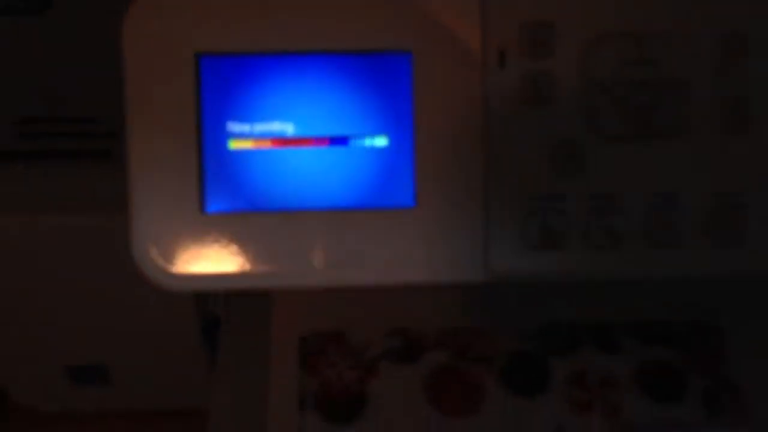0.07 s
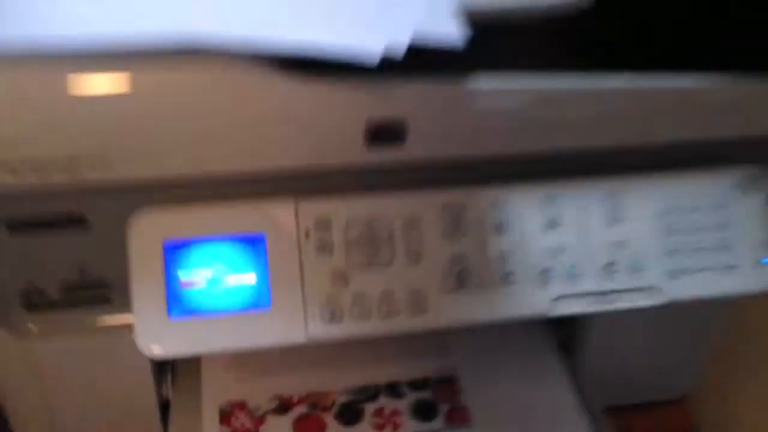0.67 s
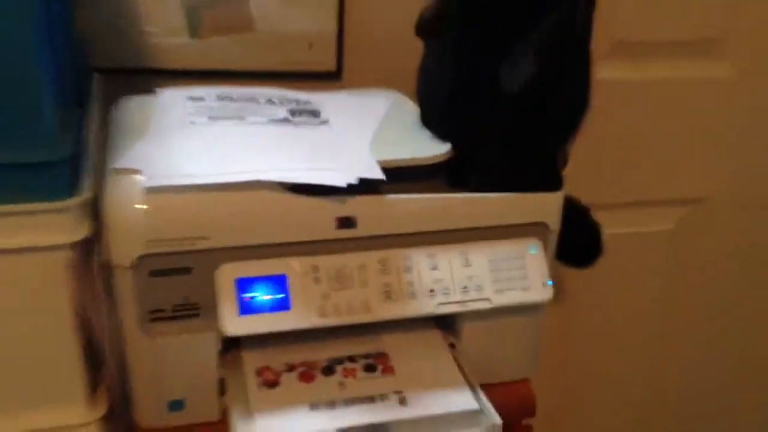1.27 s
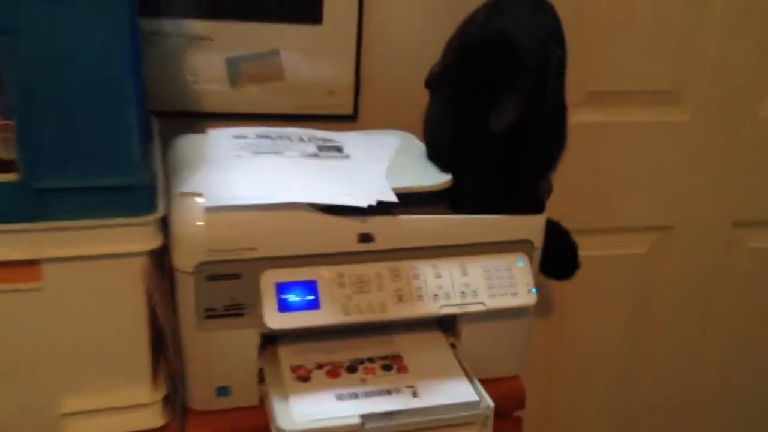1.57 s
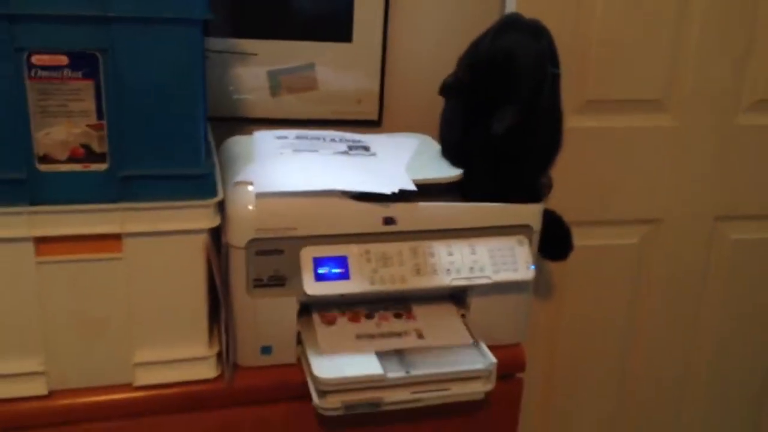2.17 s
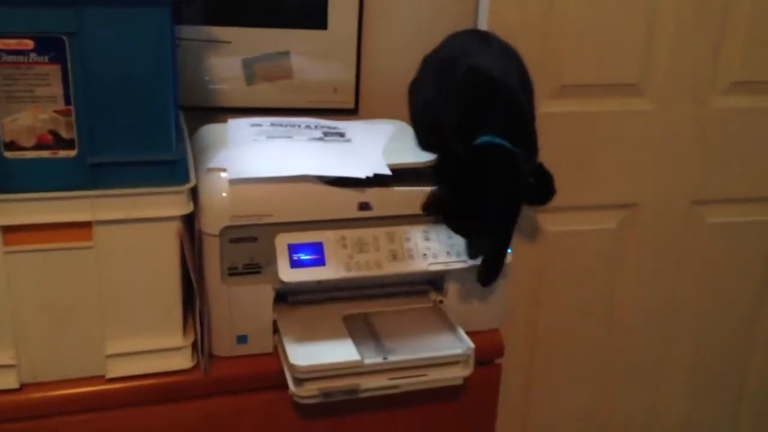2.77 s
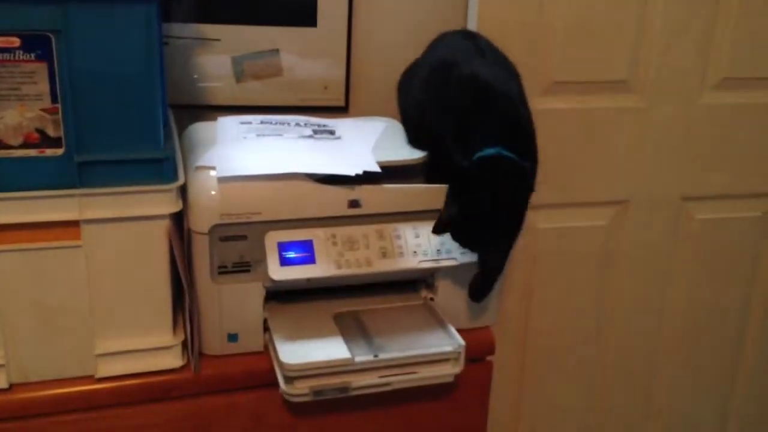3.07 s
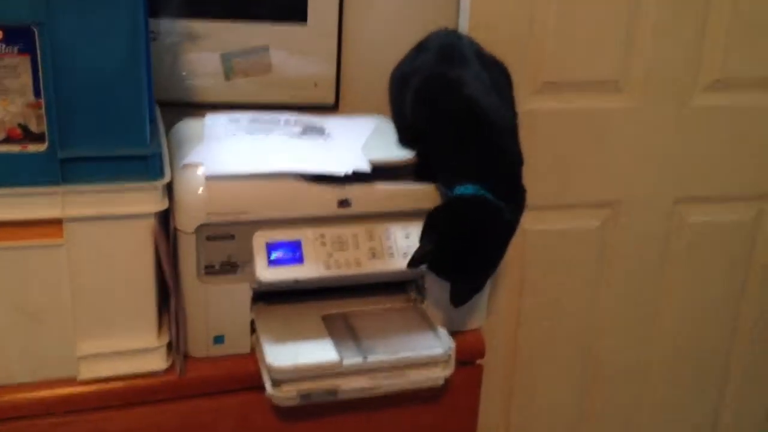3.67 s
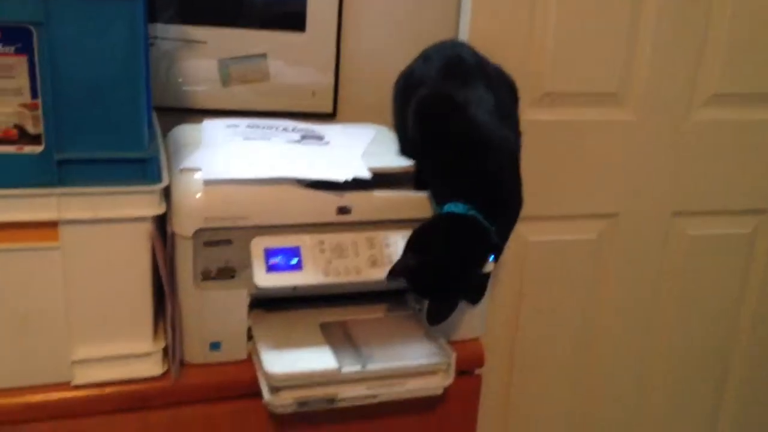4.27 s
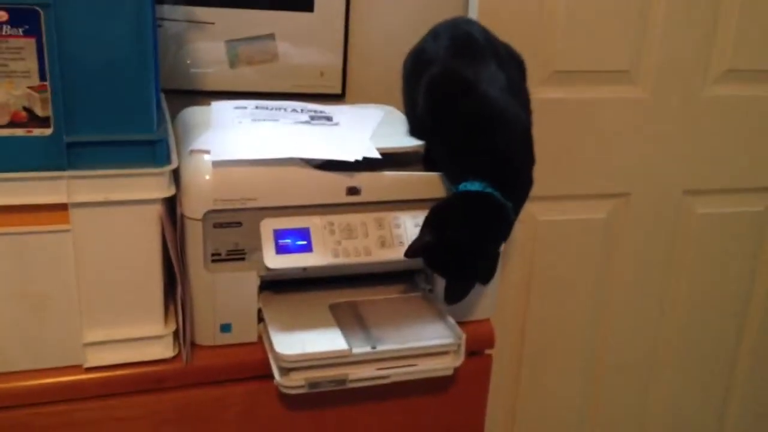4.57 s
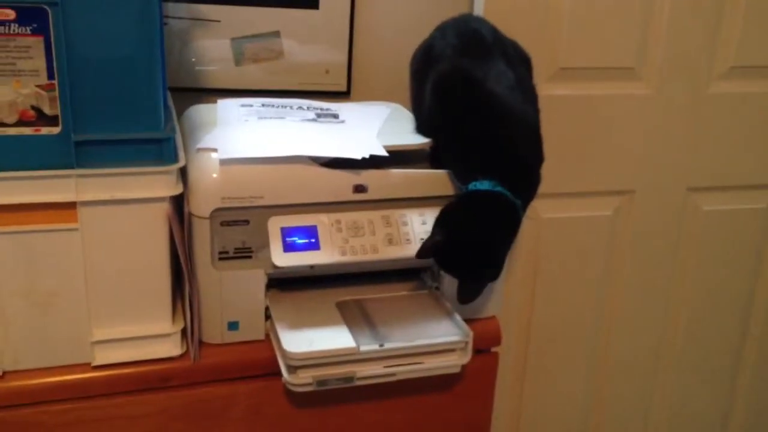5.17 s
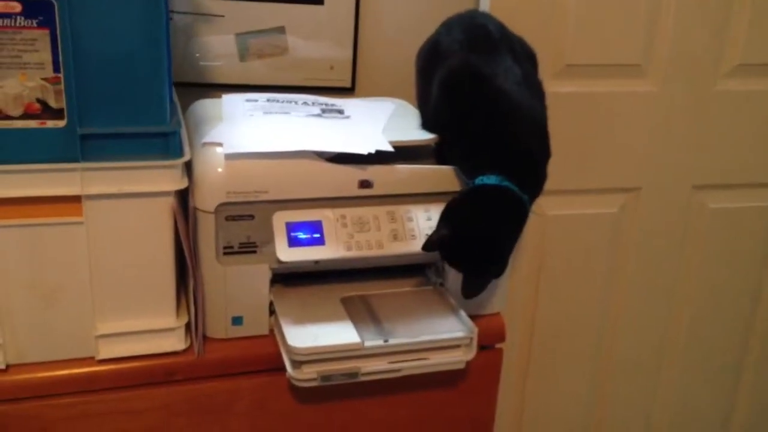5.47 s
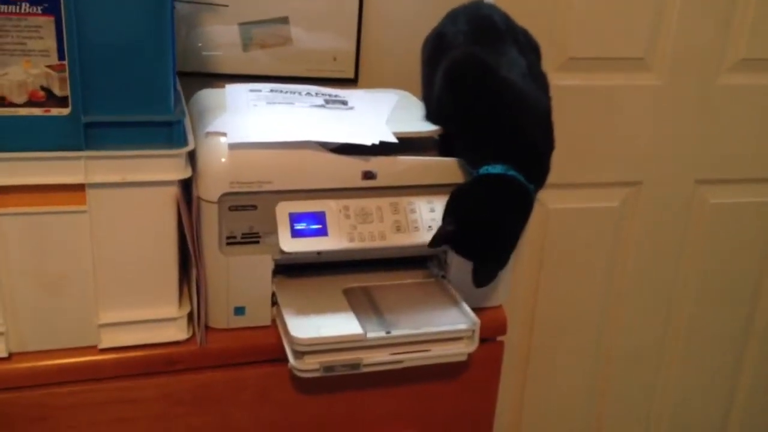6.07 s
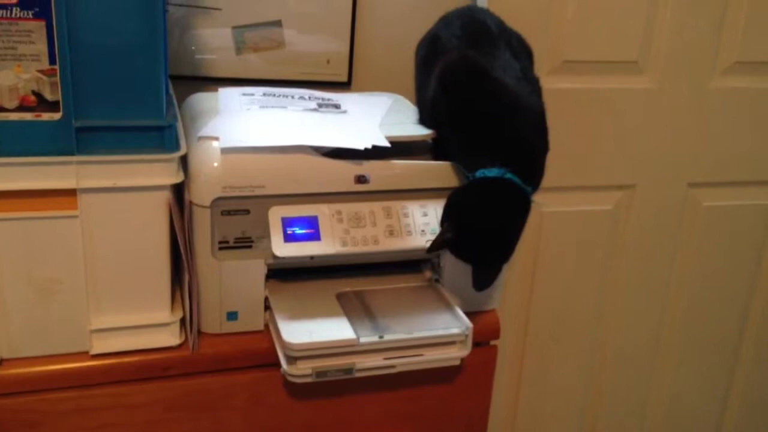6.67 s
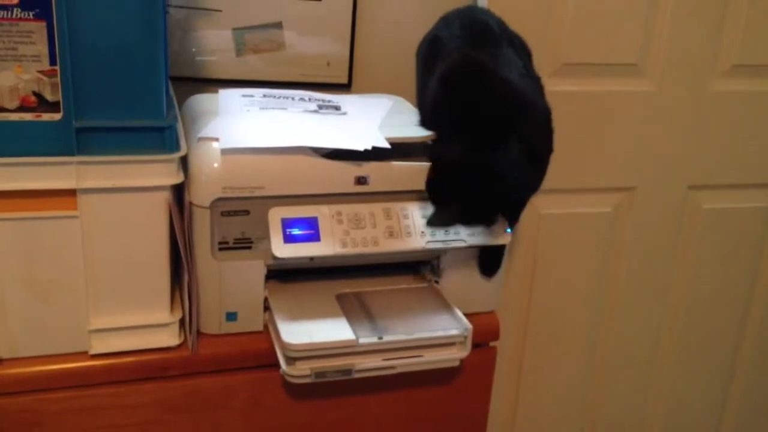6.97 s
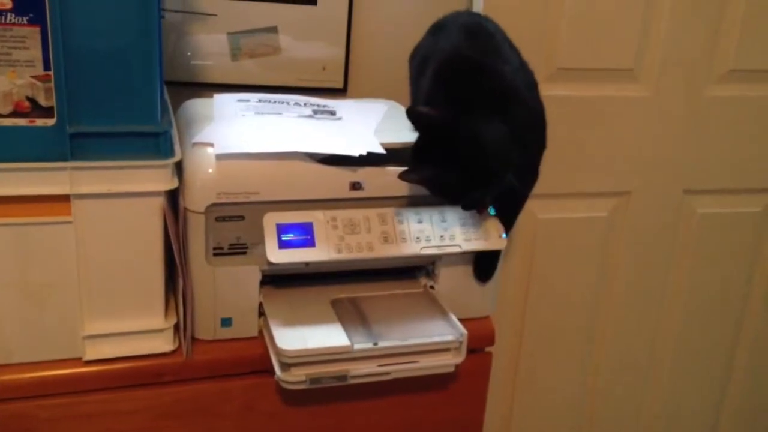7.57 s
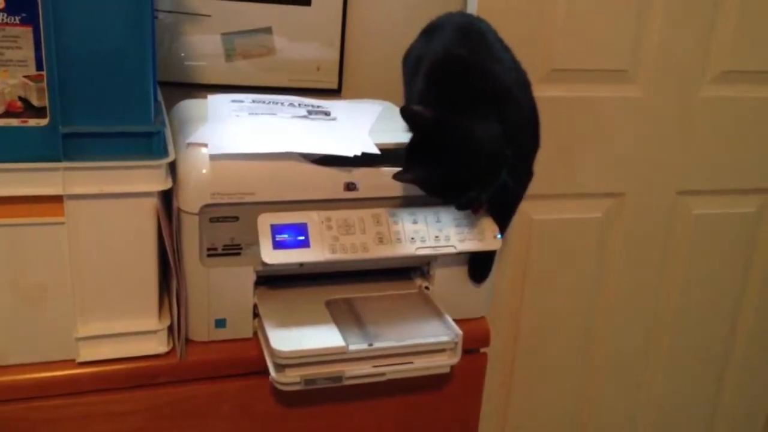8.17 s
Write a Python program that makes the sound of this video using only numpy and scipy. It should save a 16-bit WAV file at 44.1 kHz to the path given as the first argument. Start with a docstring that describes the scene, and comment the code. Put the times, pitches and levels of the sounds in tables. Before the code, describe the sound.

An inkjet printer runs close by in a small room, over a soft hush and faint low rustle. At about 0.4 seconds a loud plastic clack and squeak set off the carriage, which rubs along its rail with more clicks, short squeaks and dull knocks until a sharp snap at 2 seconds. The rollers then push out a sheet with a soft gear rattle and paper rasp, with a brief rubbery groan at 2.5 seconds. From 3.7 seconds the gears rattle louder in spurts. A heavy clunk, the loudest moment, lands at 4.6 seconds, followed by small squeaks and a sharp clack at 5.1. From about 5.4 seconds faint print passes of motor whine and sizzling hiss alternate with short paper steps. There is a knock at 6.2 seconds, then light thumps and tiny groans around 8 seconds as printing continues to the end.

```python
"""Plastic clacks and squeaks over a soft hush: an inkjet printer's carriage shuffles in a small room.
Latches snap and rebound, sliding parts stick and slip, and heavy blows ring the case. Gears rattle and
paper rasps as the rollers push one sheet out and clunk in the next; dragging rubber groans briefly.
Then short paper steps alternate with print passes of motor whine, belt hiss and nozzle sizzle."""
import sys
import numpy as np
from scipy import signal
from scipy.fft import rfft, irfft
from scipy.io import wavfile
from scipy.ndimage import uniform_filter1d

SR = 44100
rng = np.random.default_rng(int(sys.argv[2]) if len(sys.argv) > 2 else 0)


def inscribe(sig):
    """Save sig as 16-bit PCM at rate SR to the path in sys.argv[1].

    A 1-D sig is mono; a 2-D sig holds one channel per row.
    Samples are clipped to [-1, 1] before scaling.
    """
    pcm = np.round(np.clip(np.atleast_2d(sig).T, -1, 1) * 32767)
    wavfile.write(sys.argv[1], SR, pcm.astype(np.int16))


N = 371322
TIME = np.arange(N) / SR

# Sliding parts that stick, slip and hit their stop. Each row: peak time in seconds, level in dB,
# pitch in Hz, level of the guide's ring in dB, level of the knock in dB, rattle t60 in seconds.
SLIPS = [(0.449, -18, 3260, -26, -38, .035), (0.547, -35, 2420, -35.5, -40.5, .07),
         (0.703, -35, 3410, -47, -50, 0.045), (.711, -32, 2220, -28, -38, 0.025),
         (.845, -38.5, 2500, -35.5, -46, 0.075), (1.345, -47, 2790, -54.5, -56, 0.074),
         (1.402, -47, 4030, -46.5, -58.5, 0.27), (1.507, -34, 2600, -35, -58, 0.27),
         (1.636, -35, 2190, -38, -44, 0.13), (1.677, -37.5, 2500, -54, -50.5, 0.14),
         (1.756, -39, 2780, -45, -52, 0.1), (1.881, -32.5, 2540, -44, -51.5, 0.3),
         (1.928, -35, 1940, -35.5, -45, 0.26), (2.529, -48, 3390, -58, -50.5, 0.078),
         (2.728, -50, 2080, -66, -55, .04), (4.711, -38.5, 2300, -55, -47, .06),
         (4.847, -39.5, 2400, -64, -51, 0.095), (4.913, -48, 2300, -67, -43.5, 0.15)]
# Turns of the feed rollers: they eject a sheet, run free, pick up a new one, bring it under the head
# and step it on. Each row: start and end in seconds, gear level in dB, paper level in dB.
ROLLER_TURNS = [(1.86, 2.178, -53.5, -50), (2.163, 3.719, -53.5, -51), (3.676, 3.838, -42.5, -57),
                (3.801, 4.087, -45.5, -58), (4.265, 4.527, -41.5, -55), (4.509, 4.739, -39.5, -49),
                (4.796, 5.114, -58.5, -72), (5.842, 5.935, -42.5, -53), (6.147, 6.268, -44.5, -52),
                (6.225, 6.456, -49.5, -52), (6.885, 7.029, -53.5, -52), (7.483, 7.62, -51, -50),
                (8.038, 8.181, -52, -51)]


def gain_of(db):
    """Decibels to amplitude."""
    return 10 ** (np.asarray(db) / 20)


def unit_rms(x):
    """Scales a signal to rms 1."""
    return x / np.sqrt(np.mean(x ** 2) + 1e-20)


def curve_at(points, hz):
    """Reads a curve of (Hz, value) points on a log-frequency axis."""
    f, value = np.transpose(points)
    return np.interp(np.log(hz + 1), np.log(f + 1), value)


def add(mix, s, sound):
    """Mixes a sound in at s seconds."""
    part = mix[max(round(s * SR), 0):][:len(sound)]
    part += sound[:len(part)]


def colour(x, db_at, size=4096):
    """Minimum-phase EQ of unit energy, shaped by the function db_at(Hz)."""
    log_gain = np.log(gain_of(db_at(abs(np.fft.fftfreq(size, 1 / SR)))) + 1e-6)
    taps = np.fft.ifft(np.exp(np.conj(signal.hilbert(log_gain)))).real[:size // 2]
    return signal.fftconvolve(x, taps / np.linalg.norm(taps))[:len(x)]


def wander(rate_hz):
    """Smooth random modulation of rms 1, no faster than the rate."""
    slow = np.fft.rfftfreq(N, 1 / SR) < rate_hz
    return unit_rms(irfft(rfft(rng.standard_normal(N)) * slow, N))


def patchy_noise(spectrum, patchy_db):
    """Coloured noise whose level flickers, like a grip that comes and goes."""
    noise = rng.standard_normal(N) * gain_of(patchy_db * wander(150))
    return unit_rms(colour(noise, lambda f: curve_at(spectrum, f)))


def ramps(start, end, rise, fall):
    """Envelope within 0 to 1: it ramps up, holds if there is time and ramps down."""
    return np.clip(np.minimum((TIME - start) / rise, (end - TIME) / fall), 0, 1)


def move(start, end, db, rise, fall, ease_db_per_s=0):
    """Gain over one move: ramped at both ends, and able to ease off on the way."""
    elapsed = np.clip(TIME - start, 0, end - start)
    return ramps(start, end, rise, fall) * gain_of(db + ease_db_per_s * elapsed)


def background(fade_s=0.057, rest_db=-70):
    """A steady hush, with a soft low rustle close by that swells now and then."""
    # Spells of rustle. Each row: start and end in seconds, level in dB.
    spells = [(-.06, 0.083, -52.5), (.3, 0.73, -64.5), (1.436, 4.1, -66.5), (7.893, 8.44, -62.5)]
    # Tone of the rustle. Each row: frequency in Hz, level in dB.
    rustle_spectrum = [(40, -27), (90, -13), (160, 2.5), (270, -2.5), (600, -11), (1500, -15), (4000, -22),
                       (15000, -46.5)]
    # Tone of the hush. Each row: frequency in Hz, level in dB.
    hush_spectrum = [(25, -23.5), (70, -26.5), (110, -10.5), (170, -5), (300, -6.5), (520, -14.5),
                     (850, -12), (1300, -27), (2100, -11), (2700, -11.5), (4000, -8.5), (7000, -11.5),
                     (15400, -14.5)]
    stir = gain_of(2.2 * wander(12))
    swells = sum(move(start, end, db, fade_s, fade_s) for start, end, db in spells)
    rustle = np.hypot(gain_of(rest_db), swells) * stir * patchy_noise(rustle_spectrum, patchy_db=1.5)
    return gain_of(-67) * patchy_noise(hush_spectrum, patchy_db=-0.5) + rustle


def snap(mix, s, db, t60, tilt, bass_db, part_hz, scrape_db=-19, scrape_s=0.0066, bass_hz=800):
    """Mixes in one plastic hit: a brief scrape, then a dying chatter of contacts that rings the part."""
    # Tone of struck plastic. Each row: frequency in Hz, level in dB.
    plastic_spectrum = [(60, -43.5), (150, -9), (300, -8), (550, -1.5), (1000, -2), (1500, -1), (2500, 1.5),
                        (4000, -1.5), (6000, -5), (9000, -10.5), (13000, -18), (16000, -19.5)]
    t = np.arange(-SR // 50, SR // 4) / SR
    chatter = gain_of(2 * unit_rms(uniform_filter1d(rng.standard_normal(len(t)), size=40)))
    scrape = gain_of(scrape_db) * np.exp(-abs(t) / scrape_s)
    envelope = np.where(t < 0, scrape, gain_of(-60 * abs(t) / t60))
    force = rng.standard_normal(len(t)) * chatter * envelope
    force *= np.linalg.norm(envelope) / np.linalg.norm(force)

    def body_db(f):
        slope = tilt * np.log2(np.hypot(f, bass_hz) / 2500)
        shelf = bass_db / (1 + (f / bass_hz) ** 2)  # the case takes up the low push
        resonance = 6 / (1 + ((f / part_hz - 1) / 0.1) ** 2)  # the part's own damped ring
        return curve_at(plastic_spectrum, f) + slope + shelf + resonance

    add(mix, s + t[0], gain_of(db + 4) * colour(force, body_db))


def clacks():
    """Every latch snaps and rebounds once; every squeaking part knocks dully against its stop."""
    # Plastic parts snapping together. Each row: time in seconds, level in dB, rattle t60 in seconds,
    # treble tilt in dB per octave, bass shelf in dB, resonance of the part in Hz.
    latches = [(0.239, -44.5, 0.031, -.5, 13, 3900), (.288, -50, 0.018, 0.5, 14, 3250),
               (.447, -20.5, .018, 4.5, 9, 3200), (.607, -42.5, .035, 0, 17, 3220),
               (0.7104, -28.5, .02, -3, -2.5, 2120), (0.875, -52, 0.042, -2.5, -12, 2600),
               (1.633, -39, 0.056, 0, 9, 2200), (1.754, -37, 0.029, -2.5, -19, 2700),
               (1.810, -39, 0.043, -23, -41, 1920), (1.9966, -25, 0.08, 0.55, -2, 1440),
               (2.526, -45, 0.054, -4, 5, 3400), (3.019, -43.5, 0.045, -5.5, -25, 1460),
               (3.505, -48, 0.068, -6.5, -13, 4000), (4.415, -35.5, 0.085, 1, 9, 6140),
               (4.627, -36, 0.08, -3, 18, 2200), (4.638, -34, 0.098, -4.5, -25, 5340),
               (4.692, -38.5, .06, -5.5, -17, 3100), (5.0842, -25, .08, 0, 6.5, 4000),
               (6.1999, -37.5, 0.05, -7, -16, 3000), (6.255, -44.5, .09, -6, -16, 2400)]
    out = np.zeros(N)
    for s, db, t60, tilt, bass_db, part_hz in latches:
        snap(out, s, db, t60, tilt, bass_db, part_hz)
        # The rebound is softer, looser and duller.
        snap(out, s + 0.33 * t60, db - 11.5, t60 * 2.42, tilt - 1.5, bass_db, part_hz)
    for s, _, hz, _, knock_db, t60 in SLIPS:  # the knock lands just before the squeak peaks
        snap(out, s - 0.002, knock_db, t60, tilt=-9, bass_db=-13.5, part_hz=hz)
    return out


def carriage():
    """The carriage rubs along its rail, pulling hardest as it sets off."""
    # Runs along the rail. Each row: start and end in seconds, level in dB.
    runs = [(0.408, 0.457, -66), (0.553, 0.635, -42), (0.852, 1.086, -53), (1.51, 1.637, -48),
            (1.61, 1.832, -57), (4.849, 5.103, -58), (8.18, 8.265, -59.5)]
    # Tone of the rubbed rail. Each row: frequency in Hz, level in dB.
    rail_spectrum = [(59, -54), (100, -21), (152, -17.5), (192, -1.5), (262, -8), (570, 1.5), (674, -9.5),
                     (1070, -8.5), (1190, -13.5), (2520, -1.5), (3050, -0.5), (4350, -3), (4940, -6.5),
                     (6220, -7.5), (15000, -25.5)]
    rub = sum(move(start, end, db, rise=0.018, fall=0.056, ease_db_per_s=-24) for start, end, db in runs)
    return rub * patchy_noise(rail_spectrum, patchy_db=3.5)


def squeaks(guide_hz=3140, swell_s=0.0023, release_s=0.0038, rough_rad=0.45, grit_db=-9.5):
    """A slip builds up over a few uneven cycles, rings the guide beside it and is damped at once."""
    out, t = np.zeros(N), np.arange(-SR // 100, SR // 25) / SR
    envelope = np.exp(-np.where(t < 0, (t / swell_s) ** 2, t / release_s))
    for s, db, hz, ring_db, _, _ in SLIPS:
        grit = unit_rms(colour(rng.standard_normal(len(t)), lambda f: -16 * abs(np.log2((f + 100) / hz))))
        add(out, s + t[0], gain_of(db + grit_db) * envelope * grit)
        for tone_hz, tone_db in (hz, db), (guide_hz, ring_db):
            jitter = rough_rad * unit_rms(uniform_filter1d(rng.standard_normal(len(t)), size=60))
            tone = np.sin(2 * np.pi * tone_hz * t + jitter)
            add(out, s + t[0], gain_of(tone_db + 2.5) * envelope * tone)
    return out


def thumps(falloff_db_per_octave=7):
    """Heavy blows ring the low modes of the case, favouring those near the pitch each blow drives."""
    # Blows to the case. Each row: start in seconds, level in dB, frequency driven most in Hz,
    # attack in seconds.
    blows = [(.453, -40, 220, 0.0044), (0.609, -45, 228, 0.008), (1.639, -37, 200, 0.006),
             (1.81, -33.5, 235, 0.0042), (4.567, -32, 240, 0.0047), (4.626, -23.5, 210, 0.0016),
             (4.632, -20, 600, 0.0015), (4.679, -34, 210, .0045), (5.086, -40, 403, 0.0023),
             (6.195, -41, 190, 0.0051), (7.555, -48.5, 200, 0.006), (8.051, -40.5, 220, 0.0032),
             (8.193, -54, 220, 0.0033), (8.336, -48, 188, 0.0014)]
    # Modes of the case. Each row: frequency in Hz, level in dB, t60 in seconds.
    case_modes = [(92.4, -13.5, 0.066), (148, -10.5, 0.08), (206, -0.5, 0.079), (246.8, -5, 0.11),
                  (324.3, 2, 0.11), (410, 2, .05), (564, 6.5, 0.034), (715, -7, .04)]
    out, t = np.zeros(N), np.arange(SR // 3) / SR
    for s, db, drive_hz, attack in blows:
        ring = np.zeros(len(t))
        for hz, mode_db, t60 in case_modes:
            struck_db = mode_db - falloff_db_per_octave * abs(np.log2(hz / drive_hz))
            ring += gain_of(struck_db - 60 * t / t60) * np.sin(2 * np.pi * hz * t)
        add(out, s, gain_of(db) * ring * np.minimum(t / attack, 1))
    return out


def gears(mesh_hz=95, jitter=0.15, knock=0.38, drift=0.0143, spin_up_s=0.04, settle_s=0.27, brake_s=0.053):
    """Loose teeth knock and scrape, ringing the gearbox; the wheels sing as their speed settles."""
    # Resonances of the gearbox. Each row: frequency in Hz, width in Hz, level in dB.
    resonances = [(232, 23, -2.5), (554, 117, 1), (737, 52, 0), (887, 78, -2), (1113, 113, -2),
                  (1262, 77, -5), (1465, 53, -3), (2000, 170, -16.5)]
    # Noise floor between the resonances. Each row: frequency in Hz, level in dB.
    floor_spectrum = [(50, -80), (130, -10), (350, -13.5), (800, -15.5), (1500, -9.5), (3000, -13.5),
                      (5400, -21), (7500, -69), (15000, -55)]
    # Faint tones of the meshing wheels. Each row: pitch in Hz, level in dB against the gear noise.
    wheel_tones = [(578, -8.5), (742, -7), (1470, -16)]

    def housing_db(f):
        peaks = sum(gain_of(db) ** 2 / (1 + ((f - hz) / width) ** 2) ** 2 for hz, width, db in resonances)
        return 10 * np.log10(gain_of(curve_at(floor_spectrum, f)) ** 2 + peaks)

    teeth = np.cumsum(mesh_hz * (1 + jitter * wander(45))) / SR
    scrape = rng.standard_normal(N) * (1 + knock * np.cos(2 * np.pi * teeth)) * gain_of(wander(28))
    rattle = unit_rms(colour(scrape, housing_db))
    shaft_time = np.cumsum(1 + drift * wander(34.2)) / SR
    tones = sum(gain_of(db + 3 * wander(6.9)) * np.sin(2 * np.pi * hz * shaft_time)
                for hz, db in wheel_tones)
    turning = sum(move(start, end, db, spin_up_s, brake_s) for start, end, db, _ in ROLLER_TURNS)
    settled = sum(move(start, end, db, settle_s, brake_s) for start, end, db, _ in ROLLER_TURNS)
    return gain_of(-2.5) * (turning * rattle + settled * tones)


def paper(grip_db=0.64, ticks_per_s=45, tick_s=0.0018, crinkle_db=-11):
    """The sheet rasps over its guides: each band grips in its own time, and small ticks crinkle through."""
    # Tone of sliding paper. Each row: frequency in Hz, level in dB.
    paper_spectrum = [(60, -28), (170, -21), (400, -6), (1200, -6.5), (2200, 3), (2700, -0.5), (3400, 1),
                      (4500, -2), (5800, -4), (8000, -10), (11000, -15.5), (15500, -23)]
    noise = rfft(rng.standard_normal(N))
    edges_hz = np.geomspace(1200, 9000, num=9)
    band = np.searchsorted(edges_hz, np.fft.rfftfreq(N, 1 / SR))
    rasp = sum(irfft(noise * (band == k), N) * gain_of(grip_db * wander(22))
               for k in range(len(edges_hz) + 1))
    ticks = (rng.random(N) < ticks_per_s / SR) * rng.random(N)
    crinkles = signal.lfilter([1], [1, -np.exp(-1 / (tick_s * SR))], ticks) * rng.standard_normal(N)
    rub = unit_rms(rasp * gain_of(wander(120))) + gain_of(crinkle_db) * unit_rms(crinkles)
    sliding = sum(move(start, end, db, rise=0.04, fall=0.053, ease_db_per_s=-1.5)
                  for start, end, _, db in ROLLER_TURNS)
    return sliding * unit_rms(colour(rub, lambda f: curve_at(paper_spectrum, f)))


def groans(flutter=0.0395, growl_db=2, overtone_db=-17, ramp_s=0.003):
    """Rubber drags on plastic: fast stick-slip gives a short, uneven low note."""
    # Drags of the rubber. Each row: start and end in seconds, first and last pitch in Hz, level in dB.
    drags = [(2.54, 2.611, 612, 549, -46), (7.81, 7.831, 585, 565, -58.5), (7.963, 7.977, 370, 397, -49),
             (8.02, 8.071, 307.5, 314, -47.5), (8.203, 8.234, 740, 734, -60)]
    out = np.zeros(N)
    unsteady = 1 + flutter * wander(107)
    grip = gain_of(growl_db * wander(60))
    for start, end, first_hz, last_hz, db in drags:
        pitch = np.interp(TIME, [start, end], [first_hz, last_hz]) * unsteady
        phase = 2 * np.pi * np.cumsum(pitch) / SR
        note = np.sin(phase) + gain_of(overtone_db) * np.sin(2 * phase)
        out += move(start, end, db, ramp_s, ramp_s) * note
    return out * grip


def print_passes(whine_hz=1058, sag=0.06, flutter=0.034, throb_db=3.5, nozzle_hz=5790, nozzle_db=-10.5):
    """In each pass the rough motor whine arches up to speed, the belt hisses and the nozzles sizzle."""
    # Printed swaths, each a pass out and a quieter pass back. Each row: start in seconds,
    # motor whine in dB, spray and belt hiss in dB.
    swaths = [(5.39, -77, -74), (5.925, -70, -64.5), (6.42, -65.5, -63), (7.01, -68, -65),
              (7.599, -69.5, -63), (8.215, -66, -64.5)]
    # Tone of the spray and belt hiss. Each row: frequency in Hz, level in dB.
    hiss_spectrum = [(80, -11), (180, 1), (330, -2), (480, 9), (750, 6), (1500, 4.5), (2100, 8), (2800, 3),
                     (3600, 6), (5300, 3.5), (5850, 5), (6800, -5), (11000, -8), (13500, 1), (15500, -3)]
    pass_s, return_after_s, ramp_s = 0.235, 0.255, 0.055
    returns = [(s + return_after_s, whine_db - 7.5, hiss_db - 2.5) for s, whine_db, hiss_db in swaths]
    speed, whine_gain, hiss_gain = np.ones(N), np.zeros(N), np.zeros(N)
    for start, whine_db, hiss_db in swaths + returns:
        on = ramps(start, start + pass_s, ramp_s, ramp_s)
        speed -= sag * on * ((TIME - start) / pass_s * 2 - 1.2) ** 2  # the arch tops out just past midway
        whine_gain += gain_of(whine_db) * on
        hiss_gain += gain_of(hiss_db) * on
    motor_cycles = np.cumsum(whine_hz * (speed + flutter * wander(152))) / SR
    whine = unit_rms(np.sin(2 * np.pi * motor_cycles) * gain_of(throb_db * wander(70)))
    nozzle_cycles = np.cumsum(nozzle_hz * (1 + 0.0233 * wander(336))) / SR
    sizzle = np.sin(2 * np.pi * nozzle_cycles) * gain_of(nozzle_db + 3.7 * wander(60))
    return whine_gain * whine + hiss_gain * (patchy_noise(hiss_spectrum, patchy_db=2.5) + sizzle)


def room(x, predelay_s=0.0015):
    """Dense reflections from the near walls, each band dying at its own speed."""
    # Decay of the small room. Each row: frequency in Hz, t60 in seconds.
    decay_times = [(100, 0.42), (500, 0.27), (2500, 0.21), (6000, 0.18), (15000, 0.047)]
    t = np.arange(SR // 2) / SR
    hz, frame_s, bands = signal.stft(rng.standard_normal(len(t)), SR, nperseg=256)
    decay = gain_of(-60 * frame_s / curve_at(decay_times, hz)[:, None])
    tail = signal.istft(bands * decay, SR, nperseg=256)[1][:len(t)] * (t > predelay_s)
    return signal.fftconvolve(x, tail / np.linalg.norm(tail))[:N]


def scene():
    """The printer in its small room; the squeaks are short and nearly dry."""
    snaps, chirps = clacks(), squeaks()
    lows = thumps() + groans()
    motion = gears() + paper() + carriage() + print_passes()
    send = gain_of(-11) * snaps + gain_of(-22) * chirps + gain_of(-17) * lows + gain_of(-11.5) * motion
    return (snaps + chirps + lows + motion + room(send) + background())[None]


def record(dry, bass_cut_hz=88, treble_cut_hz=15500):
    """A small microphone loses the deep bass, and a steep low-pass trims the very top."""
    thin = signal.sosfilt(signal.butter(2, bass_cut_hz, "highpass", fs=SR, output="sos"), dry)
    lowpass = signal.firwin(511, treble_cut_hz, window=("kaiser", 9), fs=SR)
    return signal.oaconvolve(thin, lowpass[None], "same")


dry = scene()
out = record(dry)
inscribe(out)
```